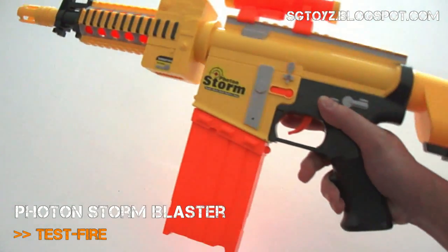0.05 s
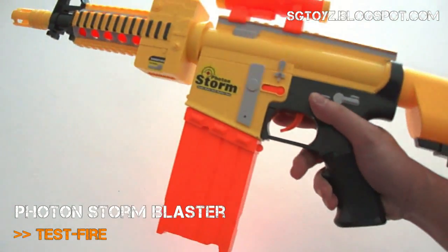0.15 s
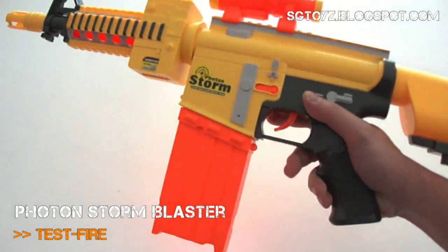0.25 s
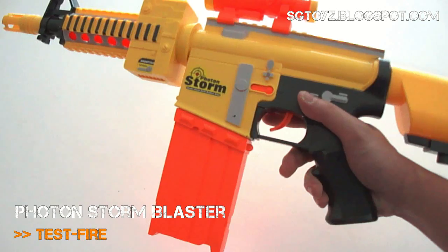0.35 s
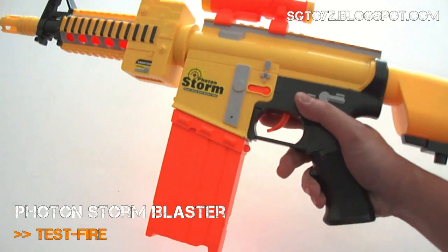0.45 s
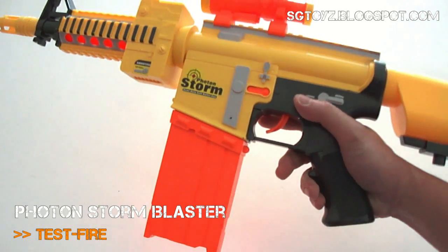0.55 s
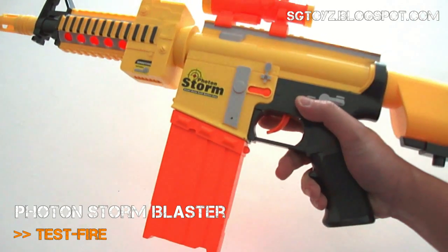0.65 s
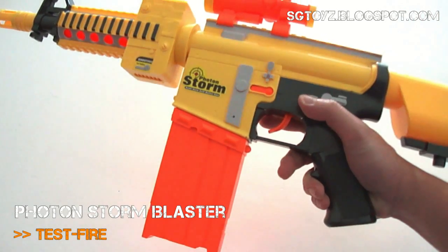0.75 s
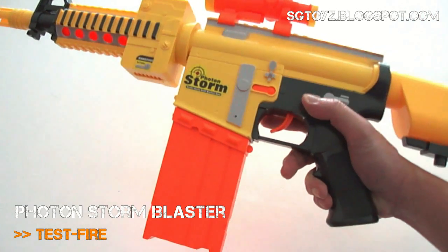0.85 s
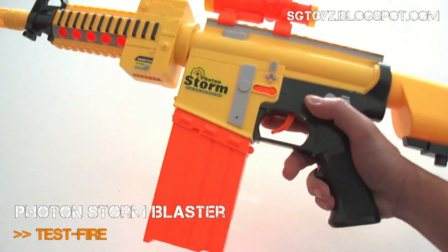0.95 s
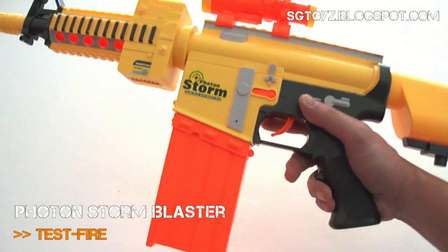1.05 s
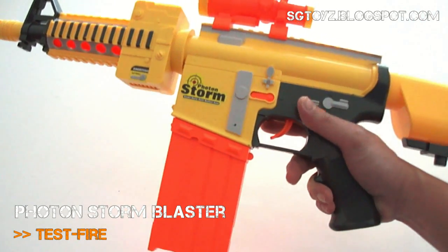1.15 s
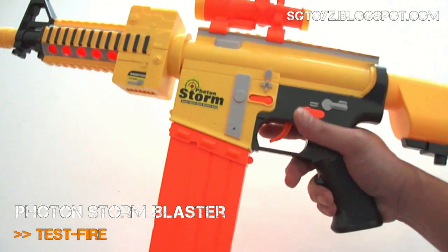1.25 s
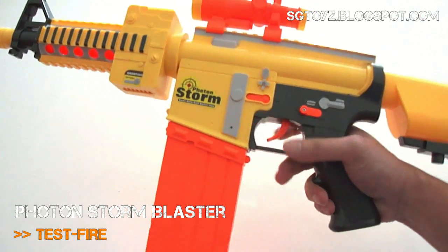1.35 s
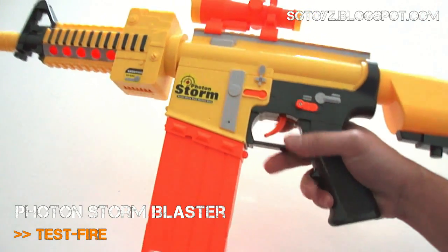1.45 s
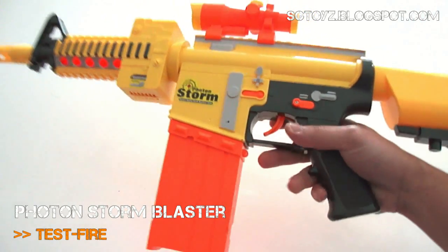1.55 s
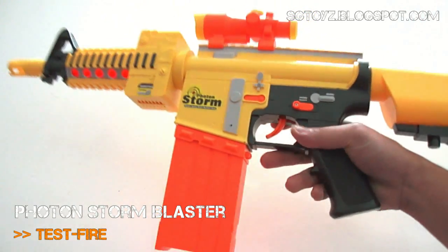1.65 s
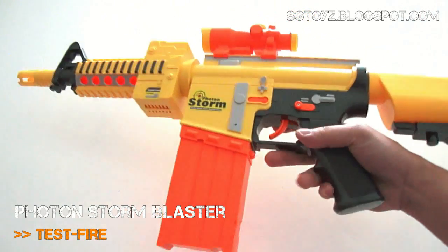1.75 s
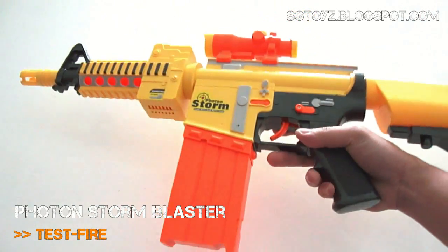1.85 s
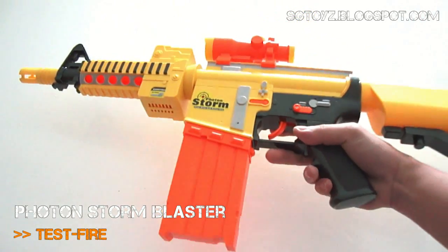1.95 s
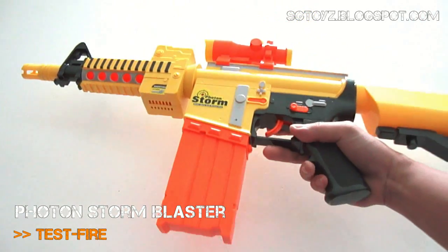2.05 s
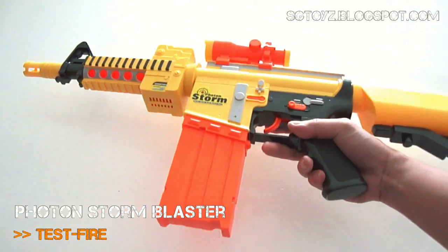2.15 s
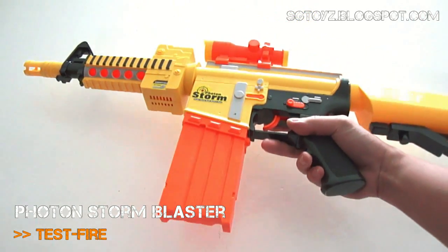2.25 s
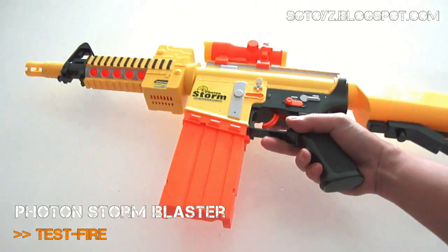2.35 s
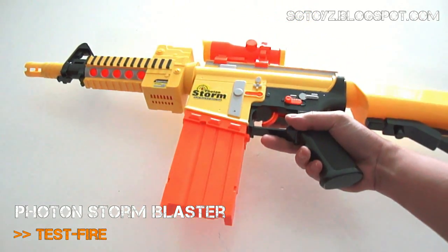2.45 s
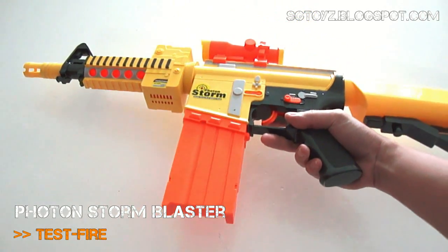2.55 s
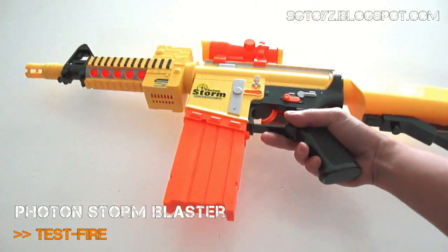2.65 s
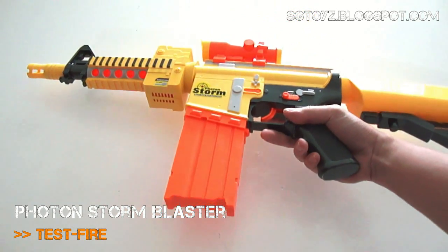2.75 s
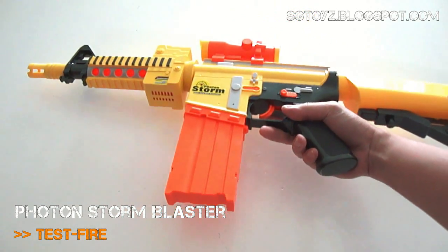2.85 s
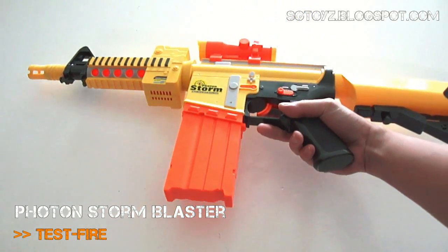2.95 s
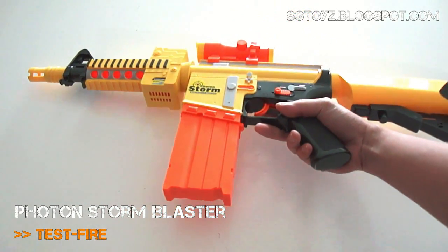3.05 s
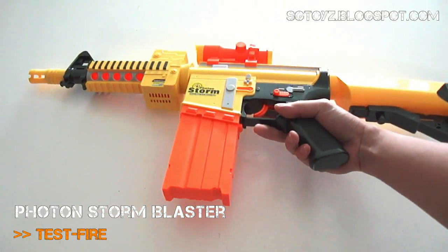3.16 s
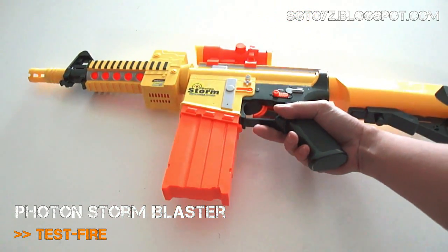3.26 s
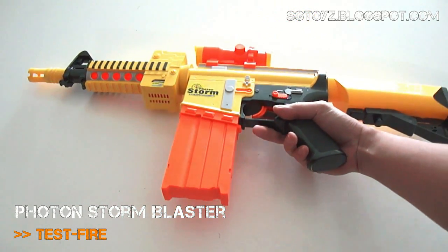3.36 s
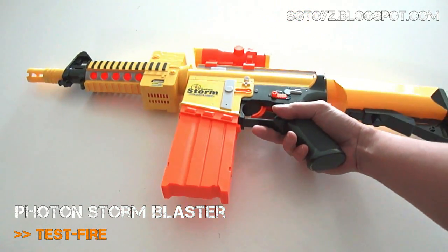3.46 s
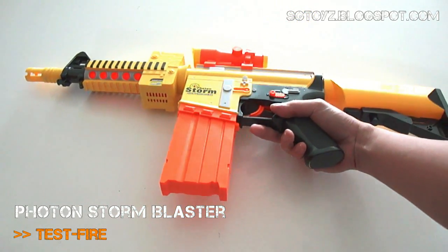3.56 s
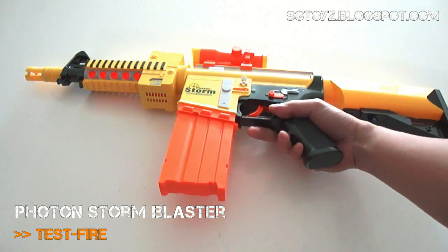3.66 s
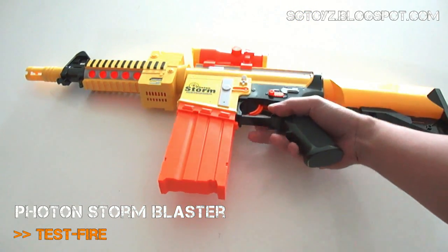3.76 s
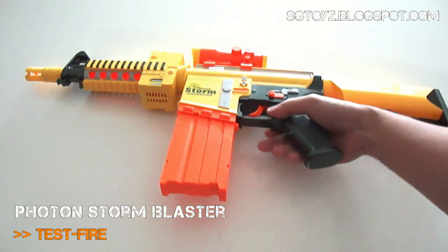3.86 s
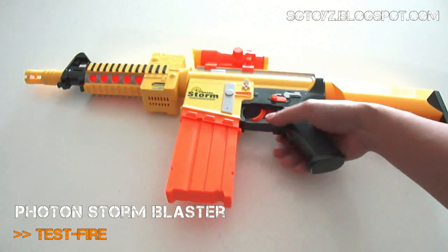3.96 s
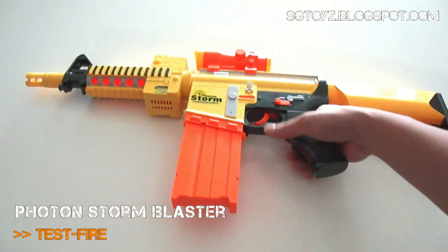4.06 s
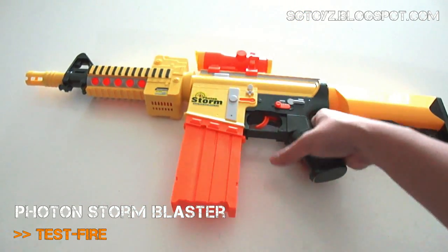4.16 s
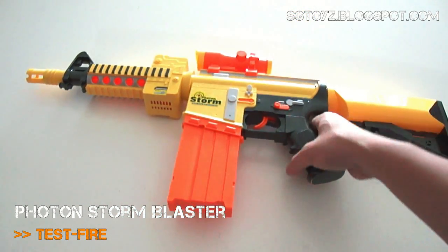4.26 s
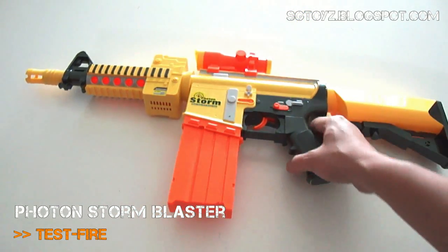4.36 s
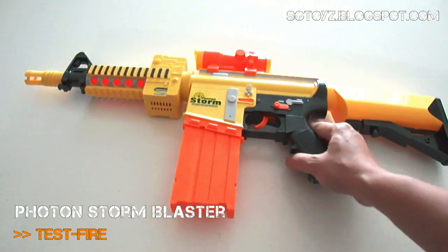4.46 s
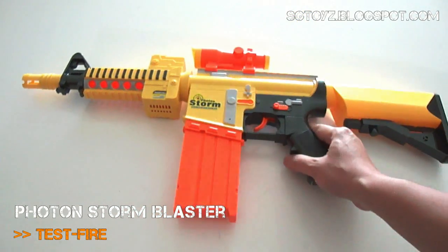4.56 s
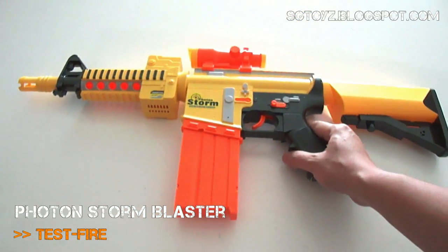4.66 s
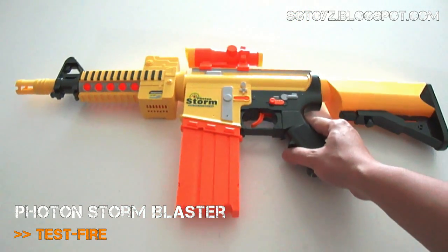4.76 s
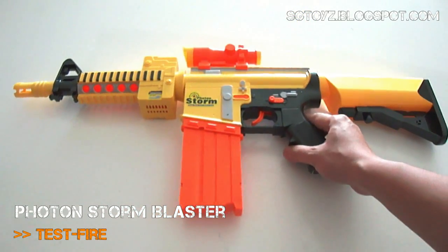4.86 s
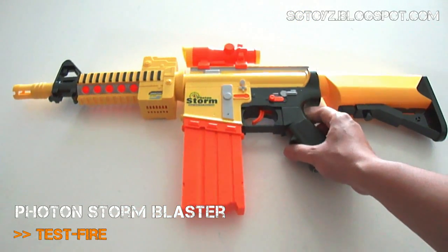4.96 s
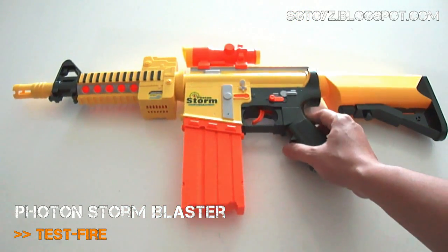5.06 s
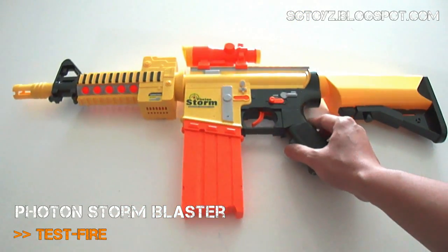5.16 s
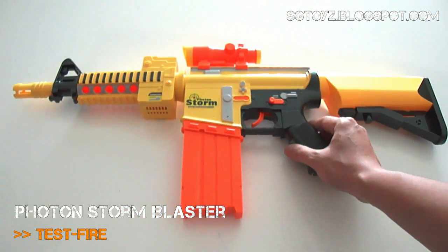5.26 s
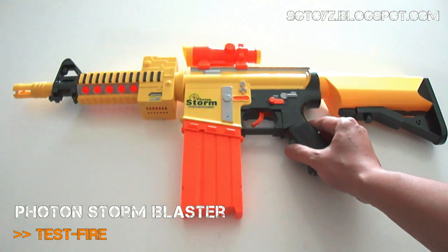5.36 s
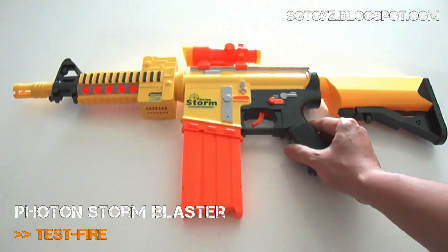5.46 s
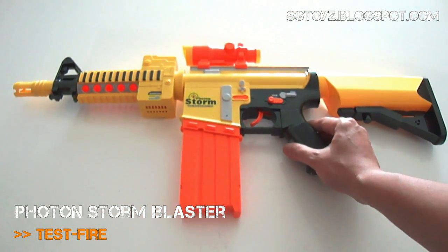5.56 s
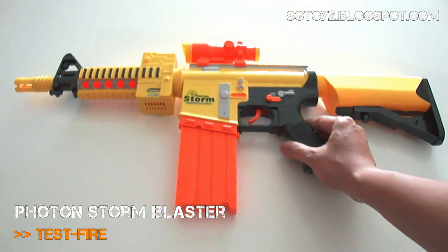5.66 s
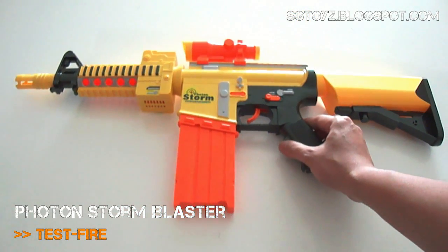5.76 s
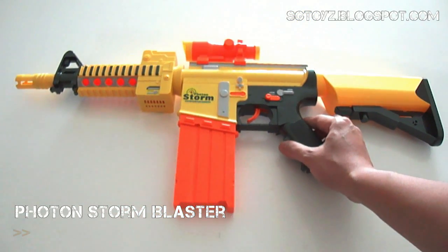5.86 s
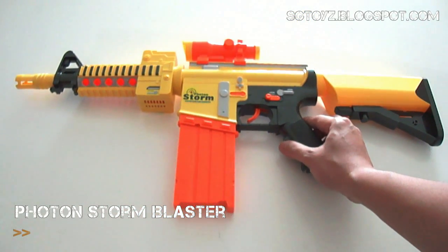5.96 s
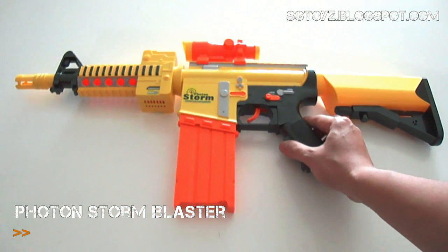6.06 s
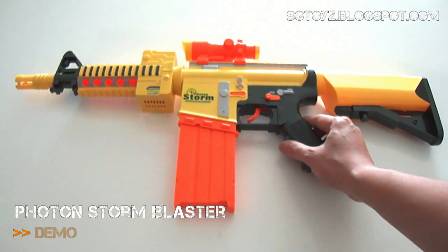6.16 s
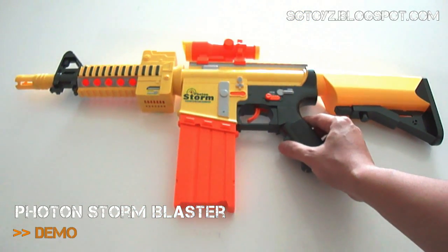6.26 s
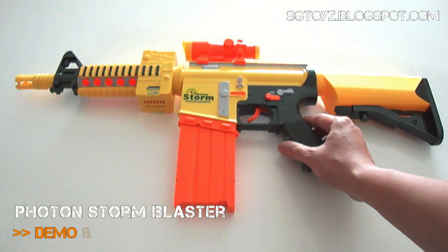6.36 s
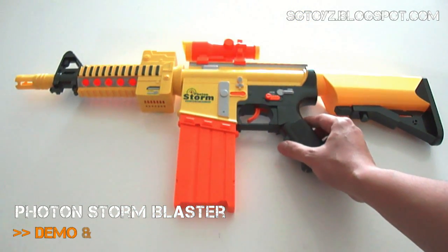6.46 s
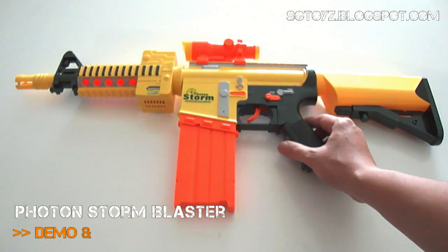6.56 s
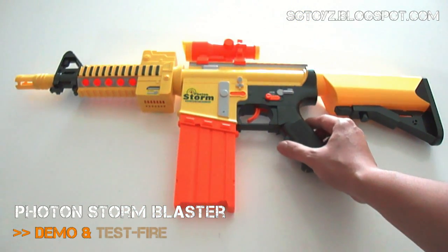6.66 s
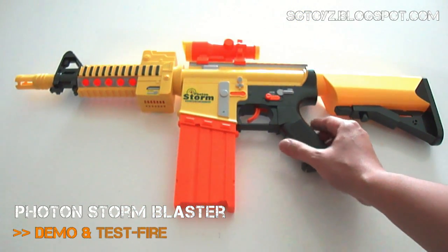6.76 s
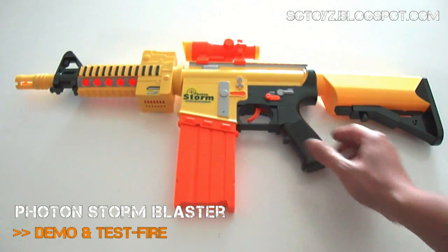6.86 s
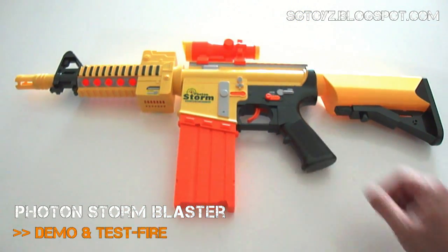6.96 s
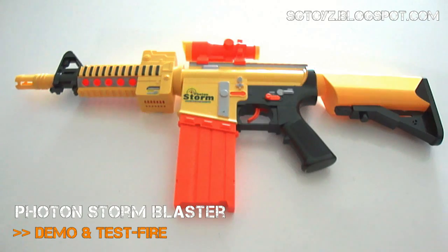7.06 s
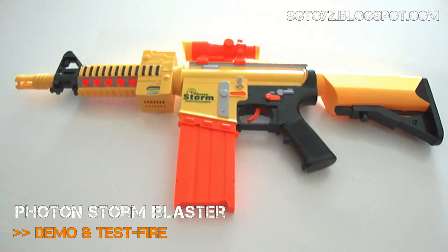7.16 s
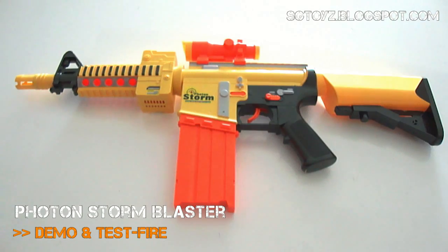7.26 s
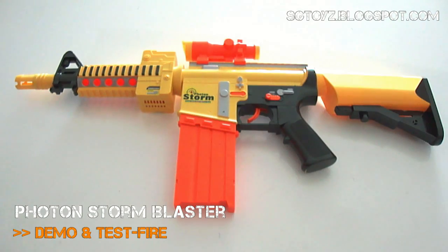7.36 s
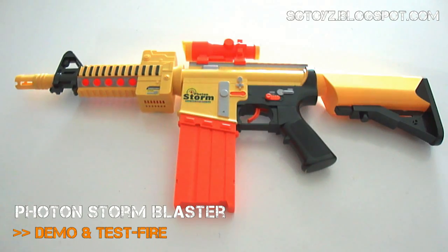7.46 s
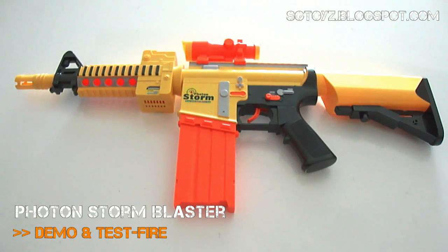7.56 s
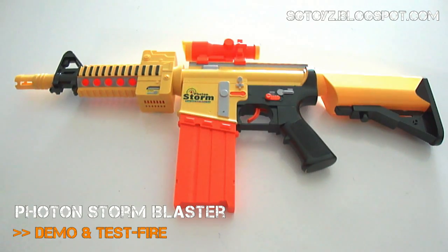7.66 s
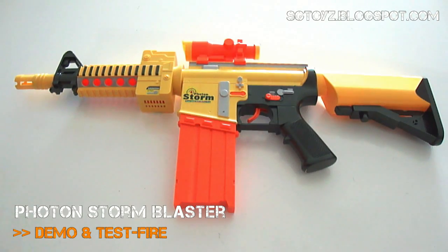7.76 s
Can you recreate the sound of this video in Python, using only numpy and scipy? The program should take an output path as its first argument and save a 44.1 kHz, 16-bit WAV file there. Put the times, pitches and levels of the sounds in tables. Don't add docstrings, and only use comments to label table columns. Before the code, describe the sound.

From 0 to 1.1 s two small electric motors run steadily inside a plastic toy blaster held close to the microphone: a buzzy mid-pitched whirr, with airy bearing noise and a loose part rattling in a fast beat. At 1.1 s power stops and the pitch slides down continuously, with a thin brush whistle and hiss. From about 2.6 to 3.5 s the slowing wheel adds dry, scratchy ticks while the whine sinks to a low purr and fades out. A double plastic knock lands at 3.7 s, with faint taps after. At 4.23 s comes the loudest clunk, chattering and scraping on a hard table, then another clack at 4.41 s and a short slide. Quiet room hiss follows, with a crisp plastic clack at 5.8 s and barely audible ticks near 7.1 and 7.55 s. The bare room adds a short, bright echo.

```python
import sys
import numpy as np
from scipy import signal
from scipy.fft import rfft, irfft, next_fast_len
from scipy.io import wavfile
from scipy.ndimage import uniform_filter1d, map_coordinates

SR = 44100
rng = np.random.default_rng(int(sys.argv[2]) if len(sys.argv) > 2 else 0)


def transcribe(u):
    v = np.clip(np.atleast_2d(u).T, -1, 1)
    q = np.round(v * 32767).astype(np.int16)
    wavfile.write(sys.argv[1], SR, q)


def amplitude_ratio(level_db):
    exponent = np.asarray(level_db, float) / 20
    return 10 ** exponent


N = 343929

# (shaft speed at the start [Hz], power off [s], braking at full speed by bearings [Hz/s],
# by grease [Hz/s], by air [Hz/s])
WHEELS = [
    (239.1, 1.141, 48.49, 51.78, 41.91),
    (243.62, 1.137, 48.91, 62.21, 15.26),
]
FULL_HZ, SAG_HZ_PER_S, DRAG_POWER = 240, 0.47, 4
OFF_S = 1.13

SLOW_ORDERS = [-30, -13, 2.5, 9, 12, 7, 0, 2, 4, -2, 4, -3, -1, -3, 5.5, 6, 0, 9, -2, -1, 0, -5, -7, 0, 4,
               8, 3, 0, 0, -2, 0, -4, 8, -8, -8, 10, -6, -6, 12]
FAST_ORDERS = [-28, -6, 5.5, 3.5, 5, 6, -2, -2, 5, -6, -3, 2, -4, -3, -4, -3, -1, -4, -3, -2, 4, -8, 0, 2,
               0, 4, -5, -8, -8, -8, -8, -8, 5, -8, -6, 13, -6, -8, 9]
SLOW_COAST_ORDERS = [-30, -8, -4, -2, -6, -9, -6, -1, -5, 2, 0, -1, -4, -2, -3, -4, -3, -2, -4, -3, -7, -4,
                     -3, -4, -2, -4, -6, -3, -4, -3]
FAST_COAST_ORDERS = [-30, -1, 0, 2, -2, -3, -4, -5, -3, -7, -5, -5, -5, -9]
# (order, level [dB])
SLOW_POLES = [(21, 6), (24, 4), (27, 6), (30, 13.5), (33, 11), (36, 8), (39, 10), (42, 14), (45, 14),
              (48, 16), (51, 17), (54, 11), (57, 11)]
FAST_POLES = [(21, 12), (24, 1), (27, 2), (30, 3), (33, 3)]
STRIKE_ORDERS = [-19, -13, 2, -1, -4.5, -5, -4, -6, -13, -27]

# (frequency [Hz], width [Hz], level [dB])
SHELL = [(496, 38, -6.5), (883, 150, 4), (2600, 49, -21), (3200, 36, -5), (4070, 55, -21), (4620, 240, -18),
         (5520, 270, -23), (7760, 56, -27), (9700, 98, -21)]
# (frequency [Hz], width [Hz], level [dB])
RIBS = [(2570, 150, 3), (3110, 80, -5), (3950, 140, -1), (4480, 250, -3), (5400, 300, 1), (7940, 130, 1),
        (9310, 130, 0)]
# (frequency [Hz], width [Hz], level [dB])
RATTLE = [(797, 60, -1), (938, 23, 2.5), (1330, 90, -5), (1620, 66, 0), (1860, 49, -2.5), (3140, 1300, -14)]
# (frequency [Hz], width [Hz], level [dB])
STRIKE_SHELL_MODE = [(890, 100, -1)]

# (frequency [Hz], level [dB])
RUSH = [(71, -75), (120, -35), (330, -13.5), (415, -4), (584, -7), (939, -0.5), (1580, -4.5), (1680, -11),
        (2200, -17.5), (2860, -27.5), (4840, -120)]
# (frequency [Hz], level [dB])
HISS = [(1200, -48), (1700, 0), (2200, -3), (2700, -5), (3500, -3), (4500, -5.5), (5100, -9.5),
        (6000, -9.5), (7400, -13.5), (9000, -17), (11000, -19)]
# (frequency [Hz], level [dB])
WHINE = [(120, -70), (250, -23), (500, -1), (900, -6), (1500, -4), (2500, -4.5), (4500, -3), (6500, -12),
         (11000, -34)]
# (frequency [Hz], level [dB])
COAST = [(100, -14), (300, -13), (470, 4), (620, -3), (850, 1), (1500, 1), (2200, 16), (3000, 17),
         (4600, -6), (5500, 4), (6300, -4), (7500, -10), (11000, -10)]

# (time [s], level [dB])
HELD = [(0, -23), (.6, -24.5), (1.0, -23), (1.15, -24), (1.35, -24), (1.55, -25), (1.9, -29), (2.5, -23.5),
        (2.9, -22), (3.1, -21), (3.45, -20.5), (3.65, -24.5), (3.95, -23), (4.2, -24)]
# (time [s], level [dB])
BRUSH = [(1.1, -4.5), (1.45, -1.5), (1.75, -3.5), (1.9, 2), (2.3, 0), (2.6, -.5), (2.9, -1.5), (3.1, -0.5),
         (3.25, 0.5), (3.6, 0.5)]
# (time [s], peak level [dB])
RUBS = [(2.6094, -26), (2.668, -27), (2.7096, -28), (2.744, -22), (2.776, -25), (2.7989, -25),
        (2.8236, -24), (2.8578, -21), (2.8697, -24), (2.8822, -28), (2.8947, -27), (2.9187, -22),
        (2.933, -20), (2.9441, -22), (2.959, -21), (3.013, -29), (3.0404, -23.5), (3.0546, -26),
        (3.131, -27), (3.1617, -25), (3.1795, -22), (3.195, -24), (3.212, -24.5), (3.2293, -26),
        (3.2908, -28), (3.3582, -29), (3.3844, -25), (3.405, -23), (3.426, -25), (3.442, -24),
        (3.4884, -31), (3.536, -27)]

# (time [s], peak level [dB], shell ring [Hz], crack level [dB],
# table thump level [dB])
KNOCKS = [(3.6734, -13, 1660, -2, -13), (3.675, -14, 520, -12, -24), (3.677, -11.5, 1620, -15, -12),
          (3.684, -14.5, 496, -9, -13), (3.703, -27.5, 1100, 2, -11), (3.911, -28, 1390, -7, -15),
          (3.938, -25, 1000, -6, -19), (4.19, -31, 1040, -8, -13), (4.2291, -3, 1410, -8.5, -22),
          (4.242, -13.5, 1680, -8, -15), (4.254, -19, 1480, -1, -11), (4.272, -20, 1490, -4, -13),
          (4.2918, -20, 2900, -8, -18), (4.3107, -22, 2900, -10, -16), (4.323, -18, 1300, -13, -16),
          (4.4138, -8.5, 1650, -8, -17.5), (4.4174, -9, 1350, -7, -17.5), (4.428, -14, 1240, -14, -23),
          (4.4356, -16, 1150, -18, -19), (5.26, -41, 1070, -25, -25), (5.8005, -18, 3830, -3, -27),
          (5.8026, -13.5, 1930, -10, -19), (5.8038, -13.5, 880, -9, -20.5), (5.8058, -15.5, 1490, -20, -17),
          (5.8084, -14, 2750, -14, -23), (5.814, -18.5, 1510, -20, -19.5), (6.415, -53, 821, -21, -4),
          (6.529, -51, 1060, -20, -20), (7.119, -47, 1260, 2, -20), (7.551, -35.5, 1400, -18, -14)]
# (frequency [Hz], level [dB], 60 dB decay [s])
PANELS = [(345, -17, .04), (934, 2, 0.11), (1490, -0.5, .04), (2010, -11, 0.027), (2570, -14, 0.036),
          (3210, -21, .03), (3930, -37, .03)]
# (frequency [Hz], level [dB])
THUMP = [(25, -24), (60, -25), (130, -30), (200, -24), (350, 1), (600, -0.5), (1200, -49), (3000, -80)]
# (frequency [Hz], level [dB])
CLACK = [(100, -62), (250, -19), (500, -9.5), (900, 1.5), (1700, -1), (2800, -5), (4000, -17.5),
         (8000, -31)]
# (frequency [Hz], level [dB])
CRACK = [(500, -62), (1200, -44), (2500, -5), (3800, -2), (5500, -3.5), (7500, -14), (11000, -22.5)]

# (time [s], length [s], level [dB])
SLIDES = [
    (3.918, .02, -54),
    (4.18, .03, -49),
    (4.233, 0.081, -25),
    (4.36, .06, -37.5),
    (4.442, 0.043, -30),
    (4.558, .1, -49.5),
    (5.17, .08, -59),
    (7.5, .05, -64),
]
# (frequency [Hz], level [dB])
GRIT = [(59, -50), (100, -23), (195, -1), (273, -8.5), (382, 0.5), (717, -11), (807, -6), (891, -4.5),
        (2690, -5), (3800, -9), (5050, -17), (11100, -38), (14400, -72), (22000, -120)]
# (time [s], level [dB])
FLOOR = [(0.0, -52), (7.8, -54.5)]
# (frequency [Hz], level [dB])
AIR = [(12, -64), (20, -38), (55, -16), (90, -21.5), (118, -9.5), (161, -16.5), (189, -5.5), (418, -6),
       (503, -5.5), (925, -6), (1140, -8), (1240, -8), (4060, -17.5), (8080, -21.5), (11100, -25.5),
       (14400, -61), (22000, -120)]
# (frequency [Hz], 60 dB decay [s])
ROOM = [(150, 0.75), (500, 0.51), (2000, 0.59), (5000, 0.58), (10000, 0.15)]

BODY_GROWS, BRIGHT_GROWS, HUM_GROWS = 1.0, 1.046, 4.7
BRIGHT_DB, HUM_DB, HUM_UNPOWERED_DB = -26, -40.5, -4
BRIGHT_FOLLOWS = 0.43
WHISTLE_RISE_S = 0.34

RATTLE_DB, LIFT_HZ, SETTLE_DB_PER_HZ, WEDGES_DB_PER_S = -22.5, 197, 0.4, 2.5
SHAKEN_HZ, SHAKEN_WIDTH_HZ, SHAKEN_DB = 219.4, 36, 5
SLOW_SHARE, CREST_TURNS, BLOW_POWER, STRIKE_DB = 0.75, 0.28, 1.85, -2.5
FREE_CREST_TURNS, FREE_STRIKE_DB = 0.11, -0.5

RUB_DB, RUB_T60_S = 4, 0.007
RUB_HZ, TOUCH_DB = 75, -31
HARD_T60_S, SOFTER_S_PER_DB = 0.015, 0.0007
SNAP_DB, SNAP_S = 2.5, 0.00055
GRIP_DB_PER_S, SLIP_DB_PER_S = 3500, 260


def unit(x):
    return x / np.sqrt(np.mean(x ** 2) + 1e-20)


def even(x):
    return x / np.sqrt(np.abs(uniform_filter1d(x ** 2, SR // 2)) + 1e-12)


def along(points, hz):
    f, v = np.transpose(points)
    return np.interp(np.log(hz + 1), np.log(f + 1), v)


def curve(rows):
    s, v = np.transpose(rows)
    return np.interp(np.arange(N) / SR, s, v)


def wobble(rate):
    knots = rng.standard_normal(int(N * rate / SR) + 4)
    return map_coordinates(knots, [np.arange(N) * rate / SR])


def filtered(x, response):
    m = next_fast_len(N + SR // 8)
    return irfft(rfft(x, m) * response(np.fft.rfftfreq(m, 1 / SR)), m)[:N]


def above(corner_hz, order, f):
    return 1 / (1 + (corner_hz / (f + 1)) ** order)


def resonances(modes, f):
    total = 0
    for k, (centre, width, db) in enumerate(modes):
        mode = 1j * f * width / (centre ** 2 - f ** 2 + 1j * f * width)
        total = total + (-1) ** k * amplitude_ratio(db) * mode
    return total


def shell(f):
    return 0.9 + 1.64 * np.abs(resonances(SHELL, f))


def rush_response(f):
    return amplitude_ratio(along(RUSH, f)) * (0.5 + 0.27 * shell(f))


def hiss_response(f):
    return amplitude_ratio(along(HISS, f)) * (1 + np.abs(resonances(RIBS, f)))


def flywheel(start_hz, off_s, bearings, grease, air):
    t = np.arange(N) / SR
    hz = np.linspace(start_hz - SAG_HZ_PER_S * off_s, 0, 2000)
    braking = bearings + grease * hz / FULL_HZ + air * (hz / FULL_HZ) ** DRAG_POWER
    reached_s = off_s + np.cumsum(hz[0] / len(hz) / braking)
    return np.where(t < off_s, start_hz - SAG_HZ_PER_S * t, np.interp(t, reached_s, hz))


def shafts():
    slow_hz, fast_hz = (flywheel(*wheel) for wheel in WHEELS)
    slow = np.cumsum(slow_hz * (1 + 0.0004 * wobble(25))) / SR
    beat = np.cumsum(fast_hz - slow_hz) / SR
    fast = beat + np.cumsum(slow_hz * (1 + 0.0004 * wobble(25))) / SR
    return slow_hz, slow, fast, beat


def standing(poles, rest_db):
    return [dict(poles).get(k, rest_db) for k in range(1, 61)]


def revolution(orders_db, turns, upper_db, scatter_db, poles_db):
    k = np.arange(1, 121)
    pole_orders = (k % 3 == 0) * (k > 20)
    db = upper_db + scatter_db * rng.standard_normal(len(k)) + poles_db * pole_orders
    db[:len(orders_db)] = orders_db
    phases = np.exp(2j * np.pi * rng.random(len(k)))
    pattern = irfft(np.r_[0, amplitude_ratio(db) * phases], 8192)
    return np.interp(turns % 1 * len(pattern), np.arange(len(pattern)), pattern)


def powered_whine(slow, fast):
    pattern = revolution(SLOW_ORDERS, slow, -8, 3, 5) * amplitude_ratio(1.5 * wobble(15))
    pattern = pattern + revolution(FAST_ORDERS, fast, -11, 3, 5) * amplitude_ratio(1.5 * wobble(15))
    whine = filtered(pattern, lambda f: amplitude_ratio(along(WHINE, f)) * (1.2 + 0.34 * shell(f)))
    return whine / np.sqrt(np.mean(whine[:SR // 2] ** 2))


def coasting_whine(slow, fast):
    comb = revolution(SLOW_COAST_ORDERS, slow, -8, 2, 1) * amplitude_ratio(2.5 * wobble(9))
    comb = comb + revolution(FAST_COAST_ORDERS, fast, -12, 2, 1) * amplitude_ratio(2.5 * wobble(9))
    poles = revolution(standing(SLOW_POLES, 0), slow, 0, 3, 10) * amplitude_ratio(2.5 * wobble(7))
    poles = poles + revolution(standing(FAST_POLES, -6), fast, -5, 3, 5)
    knots = rng.standard_normal(200)

    def modal(f):
        return amplitude_ratio(along(COAST, f) + 3.5 * map_coordinates(knots, [f / 70], mode='nearest'))

    coasting = even(filtered(comb, lambda f: modal(f) * rush_response(f)))
    whistle = even(filtered(poles, lambda f: modal(f) * hiss_response(f) * (0.12 + above(4600, 12, f))))
    return coasting, whistle


def friction_noise(gate, slow_hz, slowed):
    rush_noise = rng.standard_normal(N) * gate * amplitude_ratio(1.5 * wobble(30))
    rush = unit(filtered(rush_noise, rush_response))
    upper = filtered(rush, lambda f: above(1250, 6, f))
    rush = rush - upper * np.clip(1 - slow_hz / 170, 0, 1)
    hiss_noise = rng.standard_normal(N) * gate * amplitude_ratio(1.1 * wobble(40))
    hiss = unit(filtered(hiss_noise, hiss_response))
    ribs = unit(filtered(hiss, lambda f: (2.6 + np.abs(resonances(RIBS, f))) * above(2250, 8, f)))
    return rush, (1 - slowed) * hiss + 0.84 * slowed * ribs


def loose_part(gate, slow_hz, slow, beat, current):
    noise = rng.standard_normal(N) * gate * amplitude_ratio(3 * wobble(150))
    loose = unit(filtered(noise, lambda f: resonances(RATTLE, f) * f ** 4 / (f ** 4 + 450 ** 4)))
    beat_angle = 2 * np.pi * (beat + 0.45)
    shake = 0.46 + 0.45 * np.cos(beat_angle) + 0.17 * np.cos(2 * beat_angle)

    crest = beat + CREST_TURNS + FREE_CREST_TURNS * (1 - current)
    swing = SLOW_SHARE + np.exp(2j * np.pi * crest)
    blows = (np.abs(swing) / (1 + SLOW_SHARE)) ** (BLOW_POWER + 1 - current)
    blows = blows * amplitude_ratio(FREE_STRIKE_DB * (1.5 - current))
    struck = unit(revolution(STRIKE_ORDERS, slow + np.angle(swing) / (2 * np.pi), -28, 3, 0))
    struck = struck * amplitude_ratio(1.5 * wobble(25))
    struck = filtered(struck, lambda f: (0.16 + 0.84 * above(695, 16, f))
                      * (1 + np.abs(resonances(STRIKE_SHELL_MODE, f))))

    db = RATTLE_DB - WEDGES_DB_PER_S * np.arange(N) / SR
    db = db - SETTLE_DB_PER_HZ * np.clip(LIFT_HZ - slow_hz, 0, None)
    db = db + SHAKEN_DB / (1 + ((slow_hz - SHAKEN_HZ) / SHAKEN_WIDTH_HZ) ** 2)
    return amplitude_ratio(db) * (shake * (0.7 - 0.15 * current) * loose + amplitude_ratio(STRIKE_DB) * blows * struck)


def motors():
    slow_hz, slow, fast, beat = shafts()
    since_off = np.arange(N) / SR - OFF_S
    current = np.clip(1 - since_off / 0.15, 0, 1)
    speed_db = 20 * np.log10(slow_hz / FULL_HZ + 1e-3)
    held_db, brush_db = curve(HELD), curve(BRUSH)
    blur_db = -np.clip(1 - slow_hz / 65, 0, 1)
    free = amplitude_ratio(blur_db) * np.sqrt(1 - current ** 2)
    slowed = np.clip(1.5 - slow_hz / 90, 0, 0.65)

    coasting, whistle = coasting_whine(slow, fast)
    whine = amplitude_ratio(-3.5) * current * powered_whine(slow, fast) + amplitude_ratio(brush_db) * free * coasting
    whine = whine - slowed * filtered(whine, lambda f: above(1400, 6, f))
    gate = 1 + 0.049 * np.cos(2 * np.pi * slow) + 0.14 * np.cos(2 * np.pi * fast)
    rush, hiss = friction_noise(gate, slow_hz, slowed)

    rush_db = -6 - free * (1.5 + brush_db / 2) - blur_db / 2
    body = amplitude_ratio(held_db + BODY_GROWS * speed_db) * (whine + amplitude_ratio(rush_db) * rush)

    drying = np.clip(0.35 + since_off / WHISTLE_RISE_S, 0, 1)
    fast_enough = np.clip(slow_hz / 90 - 0.4, 0, 1)
    bright_db = BRIGHT_DB + BRIGHT_GROWS * speed_db + BRIGHT_FOLLOWS * (held_db - HELD[0][1])
    bright = (0.9 - 0.1 * free) * hiss + amplitude_ratio(-5.5) * free * drying * fast_enough * whistle

    hum = 0.83 * np.sin(2 * np.pi * slow) + 1.08 * np.sin(2 * np.pi * (slow + beat + 0.13))
    hum_db = HUM_DB + HUM_GROWS * speed_db + HUM_UNPOWERED_DB * np.sqrt(1 - current)
    rattle = loose_part(gate, slow_hz, slow, beat, current)
    return body + amplitude_ratio(bright_db) * bright + rattle + amplitude_ratio(hum_db) * hum


def floor():
    air = filtered(rng.standard_normal(N), lambda f: amplitude_ratio(along(AIR, f)))
    return amplitude_ratio(curve(FLOOR) + 0.2 * wobble(8.8)) * unit(air)


def rubbing():
    shaft_hz = flywheel(*WHEELS[0])
    hits = np.zeros(N)
    at = np.flatnonzero(np.diff(np.floor(np.cumsum(shaft_hz) / SR)))
    touches = amplitude_ratio(TOUCH_DB + 3.4 * rng.standard_normal(len(at)))
    hits[at] = touches / (1 + ((shaft_hz[at] - RUB_HZ) / 25) ** 4)
    s, db = np.transpose(RUBS)
    hits[np.round(s * SR).astype(int)] = amplitude_ratio(db + RUB_DB)
    decay = amplitude_ratio(-60 * np.arange(SR // 50) / SR / RUB_T60_S)
    bursts = signal.fftconvolve(hits, decay)[:N] * rng.standard_normal(N)
    return filtered(bursts, lambda f: amplitude_ratio(along(HISS, f)) * (0.9 + 2.3 * resonances(RIBS, f)))


def knocks():
    rings, bursts = np.zeros(N + SR), np.zeros((3, N + SR))
    t = np.arange(SR // 8) / SR
    for s, db, hz, crack_db, thump_db in KNOCKS:
        start = round(s * SR)
        span = slice(start, start + len(t))
        t60 = HARD_T60_S - SOFTER_S_PER_DB * db
        fading = amplitude_ratio(-60 * t / np.clip(0.4 * t60, 0.004, 0.07))
        snap = amplitude_ratio(SNAP_DB) * np.exp(-t / SNAP_S)
        ring = (fading + snap) * np.sin(2 * np.pi * hz * t)
        panels = 0
        for f, g, life in PANELS:
            panel_db = g + rng.normal(0, 4.9) - 60 * t / min(life, 0.09)
            panels = panels + amplitude_ratio(panel_db) * np.sin(2 * np.pi * f * t)
        rings[span] += amplitude_ratio(db - 4) * (ring + 0.1 * panels)
        thump_fade = thump_db + 16.5 - 60 * t / 0.1
        clack_fade = 3.5 - 60 * t / t60
        crack_fade = crack_db + 6 - 60 * t / (0.51 * t60)
        fades = amplitude_ratio([thump_fade, clack_fade, crack_fade])
        bursts[:, span] += amplitude_ratio(db) * fades * rng.standard_normal((3, len(t)))
    out = filtered(rings[:N], lambda f: (1j * f / (250 + 1j * f)) ** 2)
    for burst, colour in zip(bursts, (THUMP, CLACK, CRACK)):
        out = out + filtered(burst[:N], lambda f: amplitude_ratio(along(colour, f)))
    return out


def slide():
    t = np.arange(N) / SR
    stroke = np.zeros(N)
    for s, length, db in SLIDES:
        grip_db = GRIP_DB_PER_S * np.clip(s - t, 0, 1)
        slip_db = SLIP_DB_PER_S * np.clip(t - s - length, 0, 1)
        stroke += amplitude_ratio(db - grip_db - slip_db)
    grains = rng.standard_normal(N) * amplitude_ratio(2 * wobble(500) + 1.2 * wobble(60))
    return stroke * unit(filtered(grains, lambda f: amplitude_ratio(along(GRIT, f))))


def room(x):
    out, hop = np.zeros(N + 3 * SR), SR // 3
    for a in range(0, N, hop):
        hz, t, z = signal.stft(rng.standard_normal(SR * 3 // 5), SR, nperseg=256)
        decay = amplitude_ratio(-60 * t / along(ROOM, hz)[:, None])
        tail = signal.istft(z * decay, SR, nperseg=256)[1]
        start = max(a - hop, 0)
        part = x[start:a + hop]
        part = part * np.hanning(2 * hop)[-len(part):]
        wet = signal.fftconvolve(part, tail / np.linalg.norm(tail))
        out[start + 300:][:len(wet)] += wet
    return out[:N]


def scene():
    drive = motors() + rubbing()
    contacts = knocks() + slide()
    reverberant = room(amplitude_ratio(-13) * drive + amplitude_ratio(-6) * contacts)
    mono = drive + contacts + reverberant + floor()
    return np.array([mono, mono])


def low_pass(x):
    return signal.sosfilt(signal.butter(12, 11690, fs=SR, output="sos"), x)


def record(dry):
    mono = dry[0] / (1 + np.abs(dry[0] / 0.8) ** 4) ** 0.25
    mono = filtered(mono, lambda hz: (hz < 11050) * 1j * hz / (30 + 1j * hz))
    return low_pass(np.array([mono, mono]))


dry = scene()
out = record(dry)
transcribe(out)
```